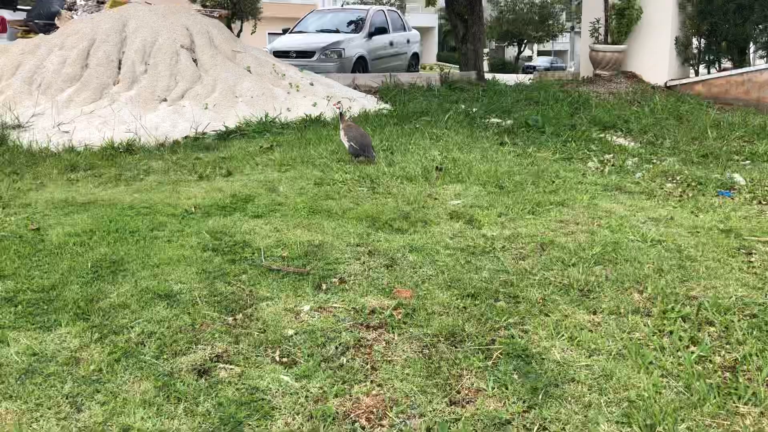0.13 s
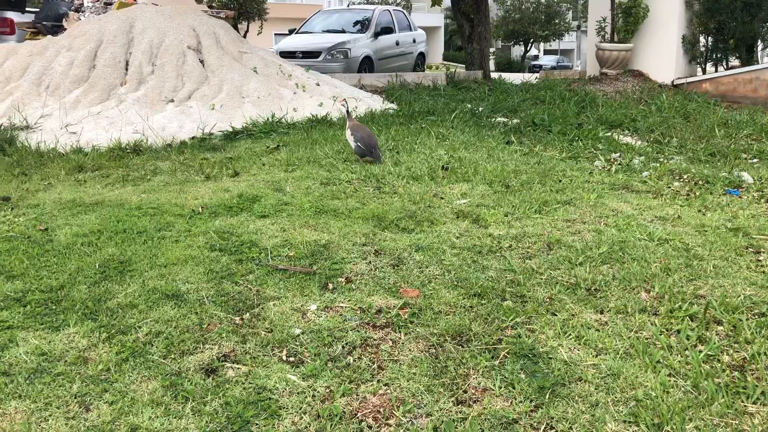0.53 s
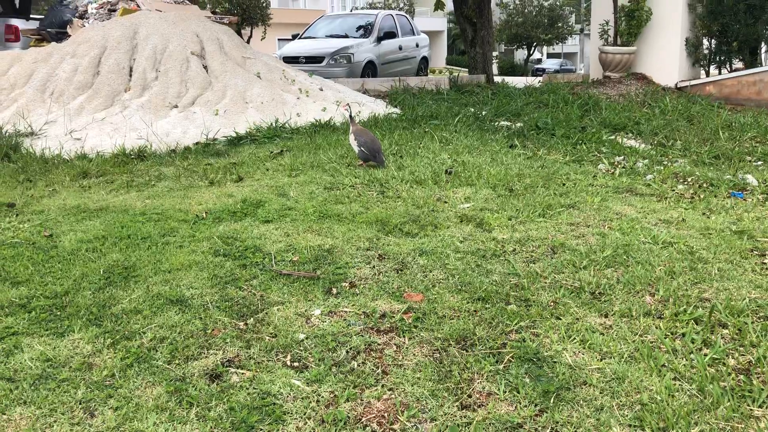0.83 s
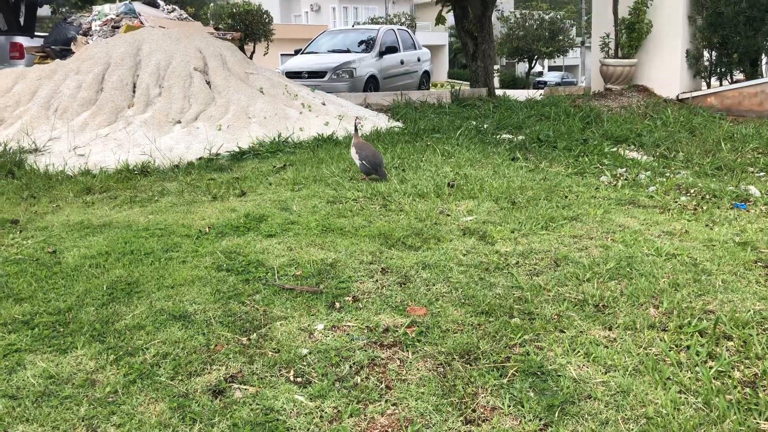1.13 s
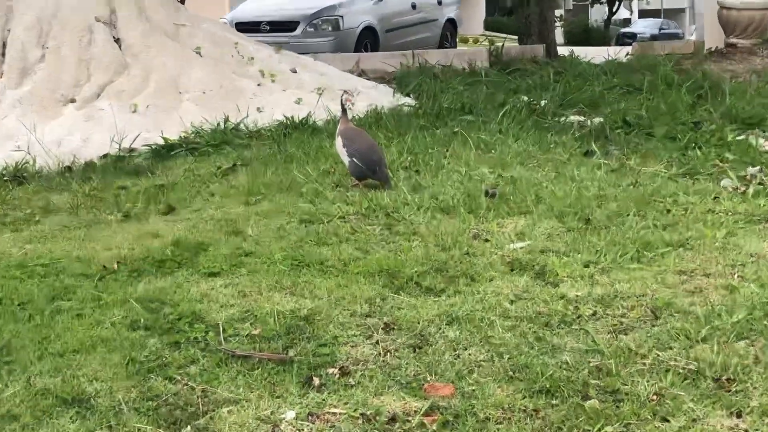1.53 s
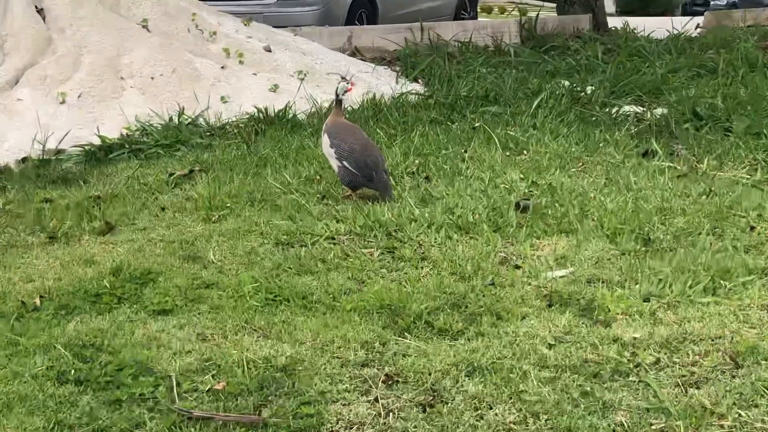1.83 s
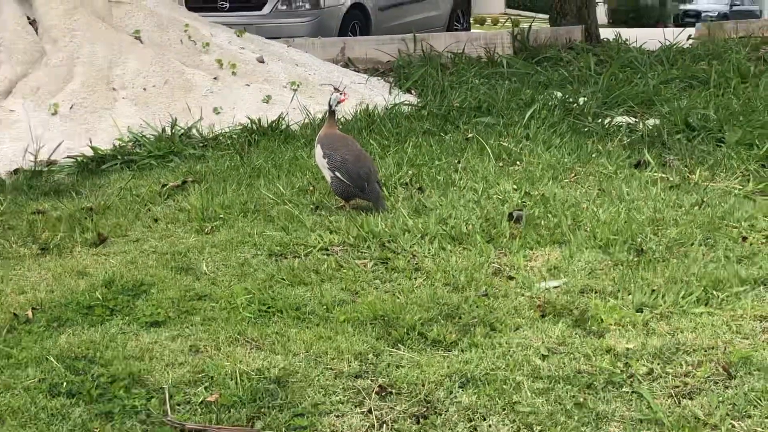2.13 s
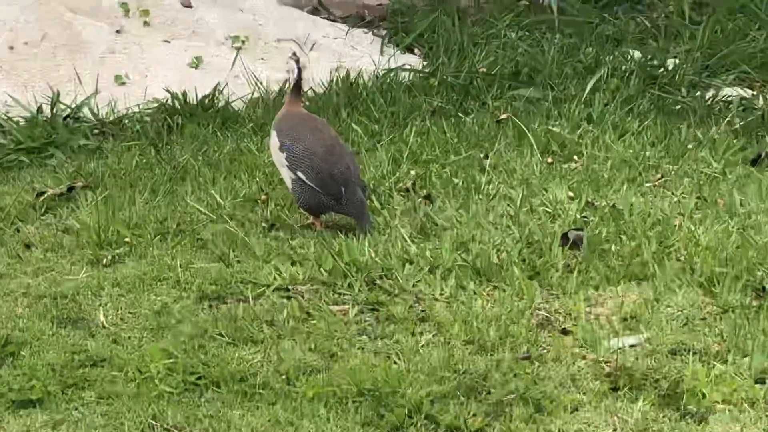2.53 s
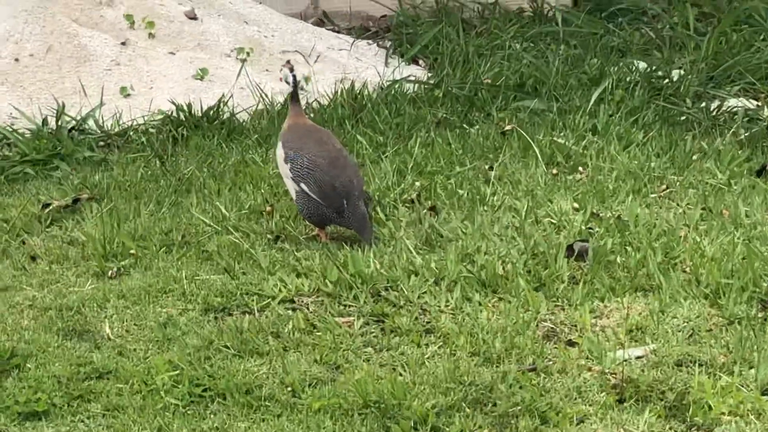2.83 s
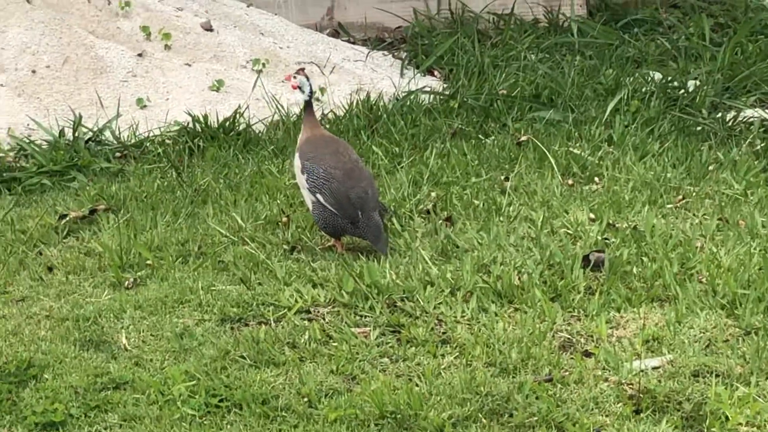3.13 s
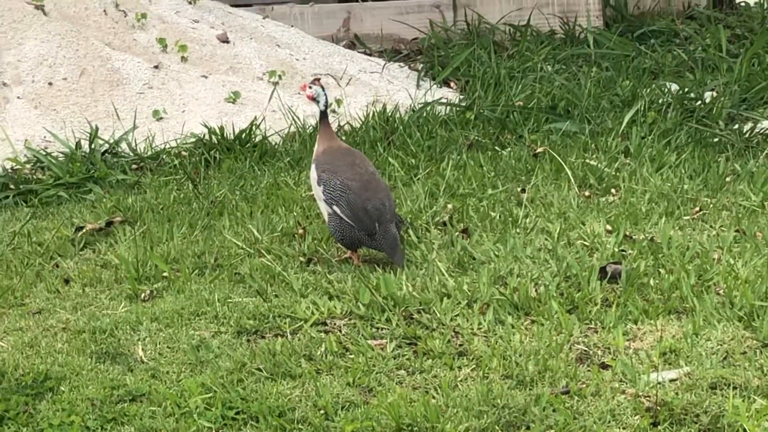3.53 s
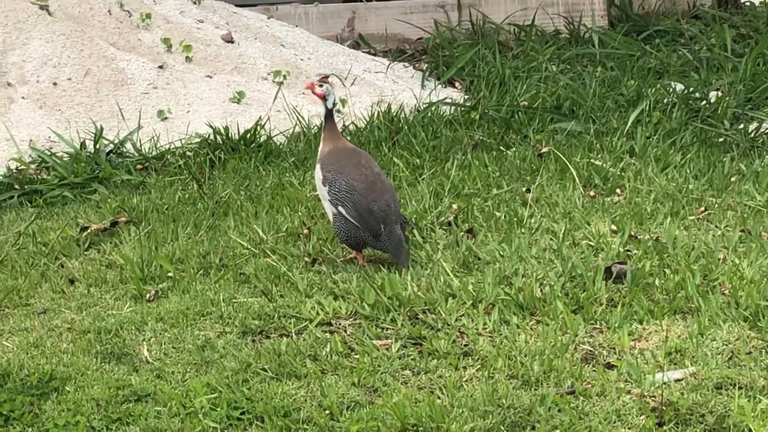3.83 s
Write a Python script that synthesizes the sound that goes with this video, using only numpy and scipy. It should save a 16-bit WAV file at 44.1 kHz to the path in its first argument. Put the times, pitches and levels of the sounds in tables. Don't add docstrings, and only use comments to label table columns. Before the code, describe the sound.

Outdoors on a lawn near houses, a guinea fowl calls steadily, squeaky, reedy and harsh, with quick wall slaps. Distant engine rumble stays low; a few faint taps and thin bird lisps come late.

```python
import sys
import numpy as np
from scipy import signal
from scipy.fft import rfft, irfft
from scipy.io import wavfile

SR = 44100
rng = np.random.default_rng(int(sys.argv[2]) if len(sys.argv) > 2 else 0)


def level_to_linear(level):
    exponent = np.asarray(level, float) / 20
    return 10 ** exponent


def output_pcm(signal):
    pcm = np.clip(np.atleast_2d(signal).T, -1, 1) * 32767
    wavfile.write(sys.argv[1], SR, np.round(pcm).astype(np.int16))


N = 176400
T = np.arange(N) / SR
ATTACK_S, RELEASE_S = 0.0069, 0.0049


def rms_one(x):
    return x / np.sqrt(np.mean(x ** 2) + 1e-20)


def drift(rate_hz, size=N):
    r = np.exp(-2 * np.pi * rate_hz / SR)
    slow = signal.lfilter([1], [1, -2 * r, r * r], rng.standard_normal(N + SR))[SR:]
    return rms_one(slow)[:size]


def resonance(x, hz, width_hz):
    r = np.exp(-np.pi * width_hz / SR)
    feedback = [1, -2 * r * np.cos(2 * np.pi * hz / SR), r * r]
    return signal.lfilter([(1 - r * r) / 2, 0, (r * r - 1) / 2], feedback, x)


def ringing(x, hz, width_hz):
    return rms_one(resonance(resonance(x, hz, width_hz), hz, width_hz))


def butter(x, order, hz, kind):
    return signal.sosfilt(signal.butter(order, hz, kind, fs=SR, output="sos"), x)


def coloured(points):
    hz, db = np.transpose(points)
    f = np.arange(N // 2 + 1) * SR / N + 1
    shape = level_to_linear(np.interp(np.log(f), np.log(hz), db)) * np.minimum(f / hz[0], 1) ** 2
    return rms_one(irfft(rfft(rng.standard_normal(N)) * shape, N))


def gate(s, length, attack, swell_db=0, release=RELEASE_S, t=T):
    edge = np.clip(np.minimum((t - s) / attack, (s + length - t) / release), 0, 1)
    share = np.clip((t - s) / length, 0, 1)
    return np.sin(edge * np.pi / 2) ** 2 * level_to_linear(swell_db * (share - 1))


def phase(s, length, hz, glide, t=T):
    share = np.clip((t - s) / length, 0, 1)
    return 2 * np.pi * np.cumsum(hz * (1 + glide * (share - 0.5))) / SR


def tone(db, angle):
    return np.sqrt(2) * level_to_linear(db) * np.sin(angle)


def around(s):
    return slice(int((s - 0.03) * SR), int((s + 0.09) * SR))


# start in seconds, length in seconds, pitch in Hz, level in dB, flutter sidebands in dB.
WHISTLES = [(0.273, 0.043, 1610, -44.5, -5), (0.442, 0.039, 1593, -34, -6), (1.059, .028, 1600, -44.5, -7),
            (1.234, 0.0554, 1597, -35, -9), (1.873, 0.042, 1602, -41.5, -5),
            (2.057, 0.0593, 1601, -33, -7.5), (2.723, 0.042, 1622, -43, -10.5),
            (2.911, 0.037, 1612, -31.5, -8.5), (2.95, 0.026, 1622, -33, -12),
            (3.504, 0.021, 1604, -42.5, -7.5), (3.682, 0.06, 1622, -31.5, -17.5)]
# multiple of the pitch, level in dB, swell in dB.
WHISTLE_TONES = [(1, 5.5, 5), (2, -24, 3), (3, -26, -2), (4, -38, 0.5), (6, -44, -10)]
# multiple of the whistle, multiple of the flutter, level in dB.
SIDEBANDS = [(0, 1, -17), (1, -1, -4.5), (1, 1, -17.5), (2, -1, -19), (3, -1, -24.5), (3, 1, -21),
             (4, -1, -22.5), (3, 2, -35), (6, -1, -36)]
FLUTTER_HZ, WHISTLE_RISE_SHARE = 357, 0.012
OVERTONE_GROWTH = 0.26


def whistles():
    out = np.zeros(N)
    flutter = 2 * np.pi * FLUTTER_HZ * T + 0.8 * drift(40)
    shaky = [level_to_linear(2.2 * drift(40)) for _ in SIDEBANDS]
    for s, length, hz, db, side_db in WHISTLES:
        w = around(s)
        t = T[w]
        p = phase(s, length, hz, WHISTLE_RISE_SHARE, t)
        for k, d, swell_db in WHISTLE_TONES:
            effort_db = OVERTONE_GROWTH * (db + 36) if k > 1 else 0
            out[w] += gate(s, length, ATTACK_S, swell_db, 0.011, t) * tone(db + d + effort_db, k * p)
        side = sum(g[w] * tone(db + side_db + d, k * p + m * flutter[w])
                   for (k, m, d), g in zip(SIDEBANDS, shaky))
        out[w] += gate(s, length + 0.005, ATTACK_S, swell_db=2.5, t=t) * side
    return out


# start in seconds, pitch in Hz, level in dB, octave in dB, locked thirds in dB.
SHORT_REEDS = [
    (0.277, 947, -51, -14, 4),
    (1.066, 952, -42, -12.5, -6.5),
    (1.878, 936.6, -47, -9.5, -1.5),
    (2.727, 949, -48, -7.5, 3),
    (3.51, 938, -39.5, -4.5, -13.5),
]
LONG_REEDS = [
    (0.47, 992, -47.5, -11, 2),
    (1.27, 981.8, -41, -2.5, -1),
    (2.094, 999.4, -45.5, -5, -3),
    (2.94, 987.6, -40, -1, -1),
    (3.723, 1001, -40.5, -3.5, -2),
]
# reed delay in seconds, thirds length in seconds, high overtones in dB.
SHORT_SHAPES = [(0.0001, .035, -45), (0.0001, .038, -45), (0.0001, .035, -45), (0.0001, .035, -45),
                (0.0001, .024, -28)]
LONG_SHAPES = [(0.0001, .063, -40), (0.0001, .063, -40), (.026, .063, -40), (0.0001, .058, -40),
               (.006, .063, -40)]
# multiple of the reed pitch, level in dB.
HIGH_TONES = [(4, -10), (5, -10), (6, -8), (7, 1), (8, -7), (10, -16)]
# thirds of the reed pitch, level in dB.
SHORT_THIRDS = [(1, -19.5), (4, 3), (7, -18.5), (8, -20), (9, -24), (10, -25), (11, -27), (12, -33),
                (14, -29), (15, -25), (16, -25), (17, -30), (18, -32), (19, -29), (20, -31), (21, -34)]
LONG_THIRDS = [(1, -19.5), (4, -2.5), (5, 2), (7, -14.5), (8, -19.5), (9, -28), (10, -20), (11, -27),
               (14, -29.5), (15, -22), (16, -23), (17, -39), (19, -23.5)]
SHORT_S, SHORT_GLIDE_SHARE = 0.037, -0.022
LONG_S, LONG_GLIDE_SHARE = 0.065, 0.045
REED_LEAD_S, REED_LEAD_DB, OCTAVE_LAG_S = 0.011, -14.5, 0.0042


def reeds(rows, shapes, thirds, length, glide, attack, rough_db, lead_db):
    out, wobble = np.zeros(N), 0.25 * drift(44)
    shaky = [(level_to_linear(rough_db * drift(45)), 0.8 * drift(45)) for _ in thirds]
    for (s, hz, db, octave_db, thirds_db), (late, last, high_db) in zip(rows, shapes):
        w = around(s)
        t = T[w]
        p = phase(s, length, hz, glide, t) + wobble[w]
        over = tone(db + octave_db, 2 * p) + tone(db + octave_db - 18, 3 * p)
        over = over + sum(tone(db + high_db + d, k * p) for k, d in HIGH_TONES)
        rough = sum(g[w] * tone(db + thirds_db + d, k * p / 3 + sway[w])
                    for (k, d), (g, sway) in zip(thirds, shaky))
        body = gate(s + late, length - late, attack, swell_db=-0.5, t=t)
        lead = gate(s - REED_LEAD_S, REED_LEAD_S + late + attack, 0.0083, t=t)
        octave_gate = gate(s + OCTAVE_LAG_S, length - OCTAVE_LAG_S, attack, swell_db=5.5, t=t)
        out[w] += (body + level_to_linear(lead_db) * lead) * tone(db, p)
        out[w] += octave_gate * over
        out[w] += gate(s, last, attack, release=0.011, t=t) * rough
    return out


# start in seconds, length in seconds, pitch in Hz, level in dB.
LOCKS = [
    (0.498, 0.029, 1496, -41.5),
    (1.305, 0.032, 1498, -47.5),
    (2.11, 0.0346, 1504, -35.5),
    (3.737, 0.024, 1503, -43),
]
# multiple of the pitch, level in dB.
LOCK_TONES = [(1, 7), (1.667, -18.5), (2, -24.5), (1.24, -14)]


def locks():
    out = np.zeros(N)
    for s, length, hz, db in LOCKS:
        p = phase(s, length, hz, 0.0033)
        tones = sum(tone(db + d - 1.5, k * p) for k, d in LOCK_TONES)
        out += gate(s, length, ATTACK_S, swell_db=-3.5, release=0.009) * tones
    return level_to_linear(0.7 * drift(40)) * out


CROAK_HZ, CROAK_WIDTH_HZ, CROAK_DB = 1600, 870, -12.5


def croak():
    ring = ringing(rng.standard_normal(N), CROAK_HZ, CROAK_WIDTH_HZ)
    return ring * sum(level_to_linear(db + thirds_db + CROAK_DB) * gate(s, LONG_S, 0.018, release=0.0092)
                      for s, _, db, _, thirds_db in LONG_REEDS)


# start in seconds, length
# in seconds, pitch in Hz, level in dB, octave in dB.
SQUEAKS = [(0.267, .016, 2260, -61, -32), (1.058, 0.018, 2240, -61, -31), (1.864, 0.018, 2190, -66, -36),
           (2.718, 0.012, 2260, -58, -36), (3.497, 0.031, 2270, -60.5, -34), (0.392, .016, 2740, -68, -5),
           (0.388, 0.053, 1330, -71, -30), (0.432, 0.024, 2850, -56, -10), (1.192, 0.024, 2810, -60, -9),
           (1.197, 0.031, 1580, -52.5, -36), (1.2, 0.014, 1285, -48, -24), (1.216, 0.027, 2840, -60, -10),
           (2.006, 0.02, 2840, -61, -9), (2.012, 0.018, 1590, -48.5, -30), (2.025, 0.009, 1244, -49, -21),
           (2.044, 0.025, 2840, -58, -9), (2.862, 0.013, 1300, -51, -29), (2.854, .012, 3820, -69.5, -30),
           (2.872, 0.025, 5300, -73, -27), (2.853, .016, 5300, -70, -32), (2.894, 0.028, 2867, -54, 1.5),
           (2.901, .016, 1390, -42, -28), (2.068, .055, 955, -58, -30), (2.934, .024, 1420, -43, -30),
           (2.016, .012, 4400, -70, -30), (2.04, .014, 4450, -70, -30), (1.2, .014, 4400, -74, -30),
           (3.632, .01, 5200, -68, -30), (3.626, .018, 1310, -60, -17), (3.672, 0.022, 3224, -58, -11)]
SCOOP_SHARE, DROOP_SHARE = 0.07, 0.05


def squeaks():
    out, shaky = np.zeros(N), level_to_linear(2.5 * drift(70))
    for s, length, hz, db, octave_db in SQUEAKS:
        w = around(s)
        share = np.clip((T[w] - s) / length, 0, 1)
        bend = 1.012 - SCOOP_SHARE * (1 - share) ** 4 - DROOP_SHARE * share ** 4
        p = 2 * np.pi * np.cumsum(hz * bend) / SR
        out[w] += gate(s, length, 0.0055, t=T[w]) * (tone(db, p) + tone(db + octave_db, 2 * p))
    return shaky * out


# frequency in Hz, level in dB per Hz.
RASP = [(1900, 0), (3100, 5), (4000, -7.5), (5300, 7), (6500, -4), (8200, -19), (10500, -7), (15600, -31)]
# short note in dB, long note in dB, swell in dB, brightness swell in dB.
RASP_CALLS = [
    (-2, -2, -6.5, -3),
    (-2, -2, -3, -3),
    (4.5, 4.5, -6.5, -3),
    (0.5, 3, -6.5, -3),
    (3, 7, 4, -12),
]
RASP_SHORT_DB, RASP_LONG_DB, RASP_LEAD_S = -68.5, -61, 0.033


def rasp():
    envelope, bright = np.zeros(N), np.ones(N)
    for short, long, shape, call in zip(SHORT_REEDS, LONG_REEDS, SHORT_SHAPES, RASP_CALLS):
        short_db, long_db, swell_db, bright_db = call
        short_gate = gate(short[0], shape[1] + 0.0082, ATTACK_S, release=0.0067)
        long_gate = gate(long[0] - RASP_LEAD_S, LONG_S + RASP_LEAD_S + 0.012, 0.026, swell_db, 0.024)
        envelope += level_to_linear(RASP_SHORT_DB + short_db) * short_gate
        envelope += level_to_linear(RASP_LONG_DB + long_db) * long_gate
        near = abs(T - long[0]) < 0.1
        bright *= level_to_linear(bright_db * np.clip((T - long[0]) / LONG_S, -1, 1) * near)
    pulse = 1 + 0.23 * np.sin(2 * np.pi * 340 * T + 3 * drift(22.2))
    air = coloured(RASP)
    top = butter(air, 4, 8000, "high")
    patches = bright * level_to_linear(3 * drift(60)) - 1
    return envelope * pulse * level_to_linear(1.2 * drift(90)) * (air + patches * top)


# delay in seconds, level in dB.
SLAPS = [
    (0.036, -15),
    (0.075, -33.5),
    (.151, -28),
]
# delay in seconds, level in dB.
BRIGHT_SLAPS = [
    (.016, -16.5),
    (.024, -8.5),
    (.031, -13),
    (.044, -14.5),
]
BRIGHT_FROM_HZ = 3330
TAIL_DB, TAIL_T60_S, TAIL_CUT_HZ, TAIL_ONSET_S = -16.5, 0.72, 12000, 0.036
GAP_HZ, GAP_WIDTH_HZ, GAP_DB = 1980, 740, -0.5
DIP_HZ, DIP_WIDTH_HZ, DIP_SHARE = 1586, 206, 0.12
STIRRED_FROM_S, STIR_DB, STIR_HZ = 0.05, 2, 40


def walls(x):
    t = T[:SR]
    decay = level_to_linear(-60 * t / TAIL_T60_S + 0.73 * drift(26, size=SR))
    tail = rng.standard_normal(SR) * decay * (t > TAIL_ONSET_S)
    echo, near = level_to_linear(TAIL_DB) * tail / np.sqrt(np.sum(tail ** 2)), np.zeros(SR)
    for s, db in SLAPS:
        echo[int(s * SR)] += level_to_linear(db)
    for s, db in BRIGHT_SLAPS:
        near[int(s * SR)] += level_to_linear(db)
    echo = echo + butter(near, 2, BRIGHT_FROM_HZ, "high")
    echo = echo + level_to_linear(GAP_DB) * resonance(near, GAP_HZ, GAP_WIDTH_HZ)
    echo = butter(echo, 1, TAIL_CUT_HZ, "low")
    echo = echo - DIP_SHARE * resonance(echo, DIP_HZ, DIP_WIDTH_HZ)
    late = np.clip((t - STIRRED_FROM_S) / 0.03, 0, 1)
    stirred = x * level_to_linear(STIR_DB * drift(STIR_HZ) - 1.5)
    early_part = signal.fftconvolve(x, echo * (1 - late))[:N]
    return early_part + signal.fftconvolve(stirred, echo * late)[:N]


# start in seconds, length in seconds, pitch in Hz, level in dB.
LISPS = [
    (2.43, 0.12, 6800, -75.5),
    (3.38, 0.14, 6877, -83),
    (3.87, 0.17, 7140, -78.5),
]
# start in seconds, length in seconds, pitch in Hz, level in dB.
TICKS = [
    (2.564, 0.0086, 1850, -61),
    (2.565, 0.0092, 2500, -66),
    (2.636, 0.0061, 2150, -54.5),
]
CLICK_S, CLICK_DB = 0.33, -69


def neighbours():
    white = rng.standard_normal(N)
    lisps = sum(level_to_linear(db) * gate(s, length, 0.041, release=0.032) * ringing(white, hz, 900)
                for s, length, hz, db in LISPS)
    click = level_to_linear(CLICK_DB) * np.exp(-((T - CLICK_S) / 0.00072) ** 2)
    click = click * rms_one(resonance(white, 8000, 5000))
    taps = sum(gate(s, length, 0.0044) * tone(db, 2 * np.pi * hz * T) for s, length, hz, db in TICKS)
    return lisps + click + taps


# frequency in Hz, level in dB per Hz.
AIR = [(53, -44), (90, -2.5), (282, -11.5), (321, -12), (444, -15), (575, -16.5), (683, -17), (865, -17),
       (15600, -46.5)]
# time in seconds, level in dB.
RUMBLE = [
    (0.05, -57),
    (0.56, -53.5),
    (1.38, -60),
    (1.39, -54.5),
    (2.37, -62.5),
    (2.45, -66.5),
    (2.77, -52),
    (4.0, -58),
]
# frequency in Hz, width in Hz, level in dB.
HUMS = [(117.7, 10.6, -66), (441, 3.3, -72.5), (349.7, 32, -78), (503.7, 18, -78.5)]
AIR_DB, RUMBLE_HZ, RUMBLE_WIDTH_HZ = -61, 59.8, 11.9


def street():
    s, db = np.transpose(RUMBLE)
    white = rng.standard_normal((2, N))
    low = resonance(resonance(white[0], RUMBLE_HZ, RUMBLE_WIDTH_HZ), RUMBLE_HZ, 40)
    low = low / (np.abs(signal.hilbert(low)) + 0.4 * np.std(low))
    engine = rms_one(low) * level_to_linear(np.interp(T, s, db))
    hums = sum(level_to_linear(d) * ringing(white[1], hz, width_hz) for hz, width_hz, d in HUMS)
    return engine + hums + level_to_linear(AIR_DB + 0.27 * drift(7.5)) * coloured(AIR)


def scene():
    short = reeds(SHORT_REEDS, SHORT_SHAPES, SHORT_THIRDS, SHORT_S, SHORT_GLIDE_SHARE,
                  attack=0.008, rough_db=2, lead_db=-45)
    long = reeds(LONG_REEDS, LONG_SHAPES, LONG_THIRDS, LONG_S, LONG_GLIDE_SHARE,
                 attack=0.014, rough_db=2.5, lead_db=REED_LEAD_DB)
    bird = whistles() + short + long + locks() + croak() + squeaks() + rasp()
    return (bird + walls(bird) + neighbours() + street())[None]


def low_pass(x):
    return signal.sosfilt(signal.butter(12, 15700, fs=SR, output="sos"), x)


START_S, FADE_IN_S = 0.034, 0.002


def record(dry):
    x = butter(dry, 4, 40, "high")
    x = signal.sosfilt(signal.cheby2(12, 50, 16500, fs=SR, output="sos"), x)
    mix = x * np.clip((T - START_S) / FADE_IN_S, 0.02, 1)
    return low_pass(mix)


dry = scene()
out = record(dry)
output_pcm(out)
```